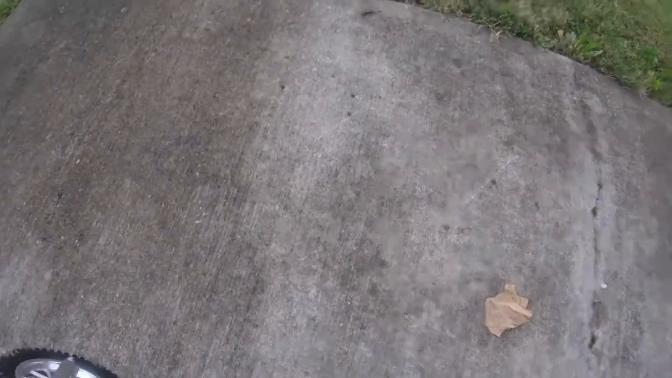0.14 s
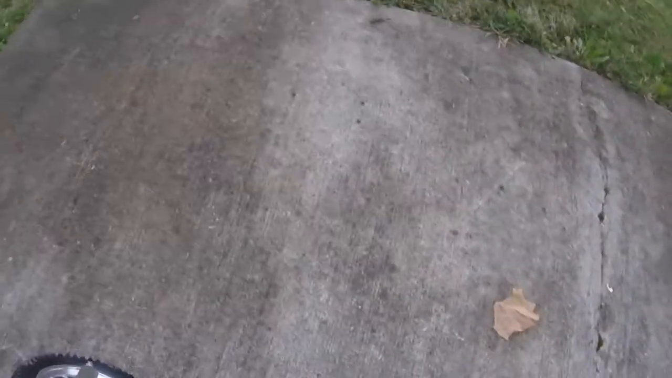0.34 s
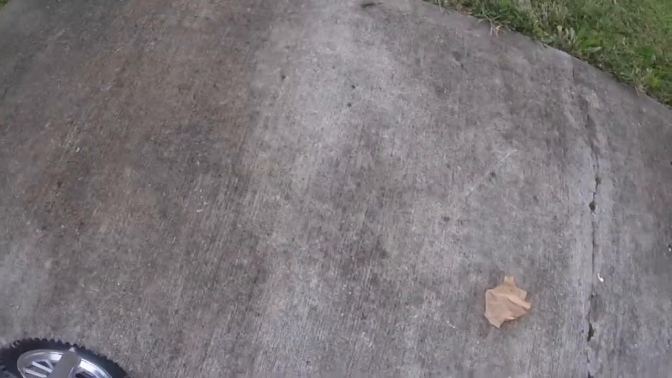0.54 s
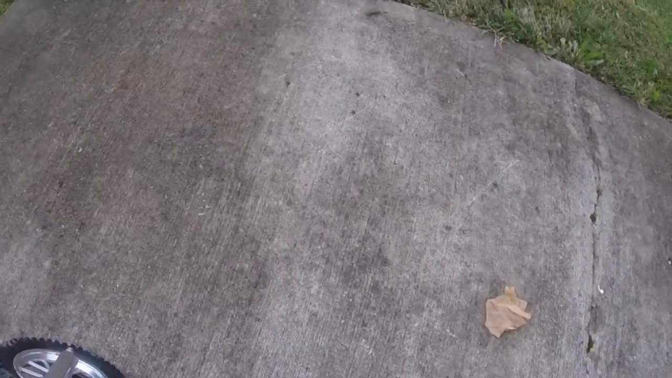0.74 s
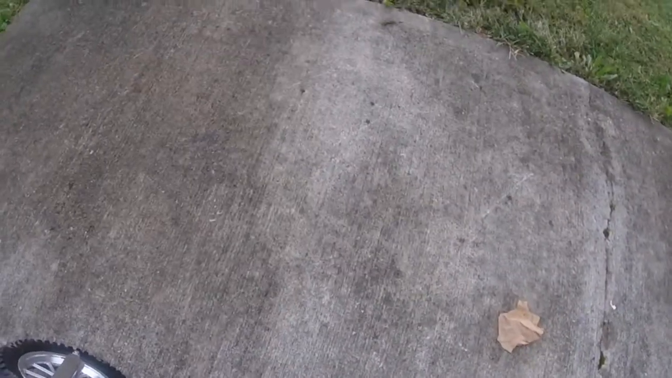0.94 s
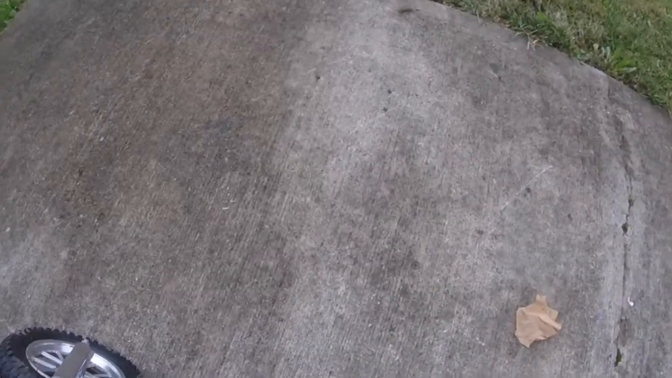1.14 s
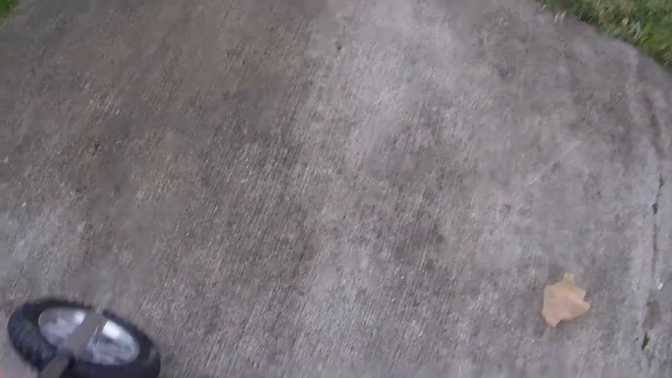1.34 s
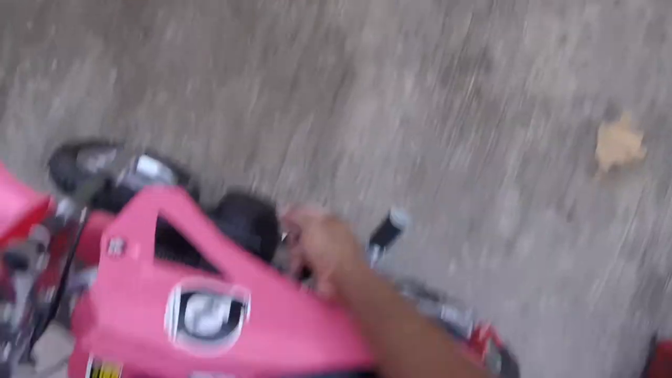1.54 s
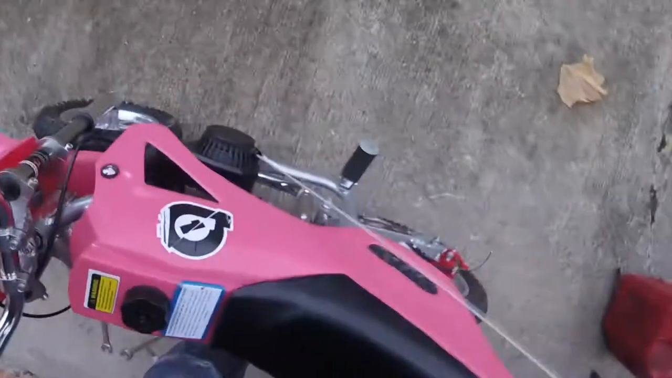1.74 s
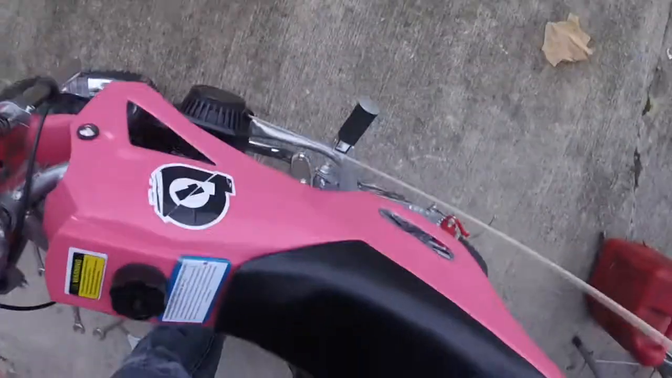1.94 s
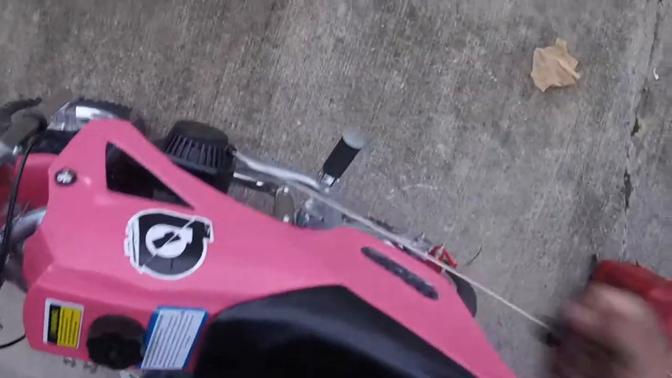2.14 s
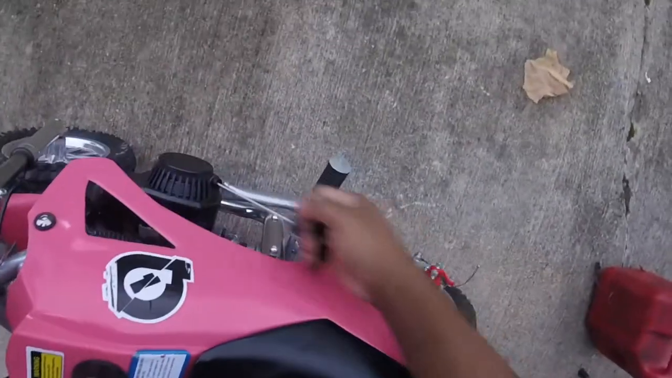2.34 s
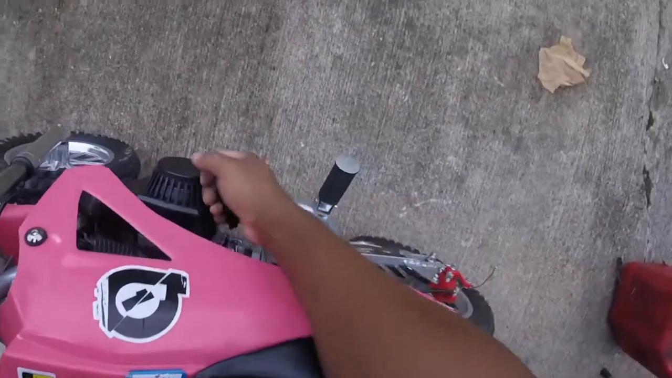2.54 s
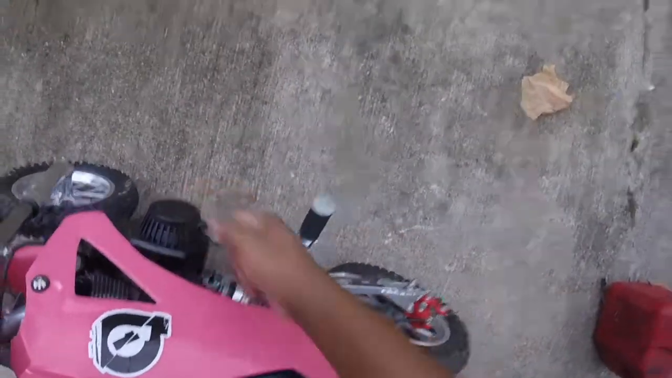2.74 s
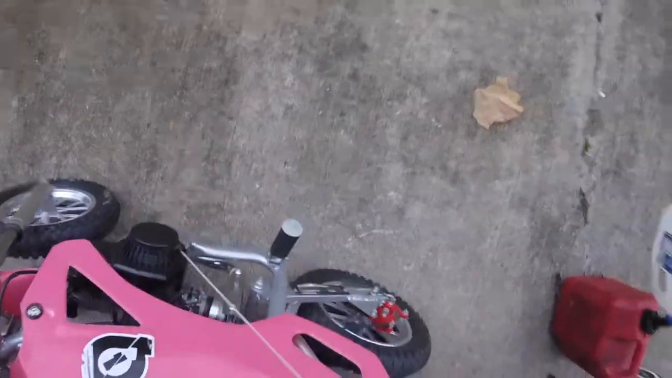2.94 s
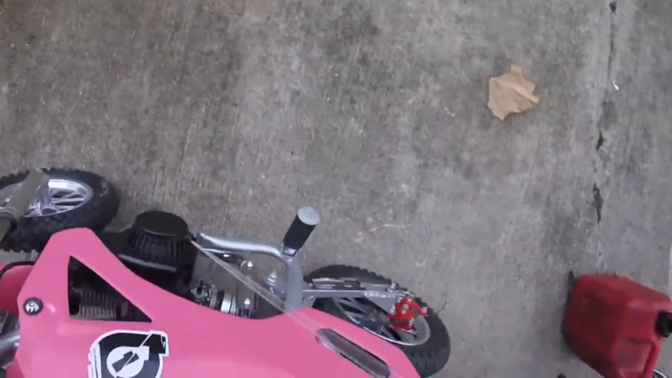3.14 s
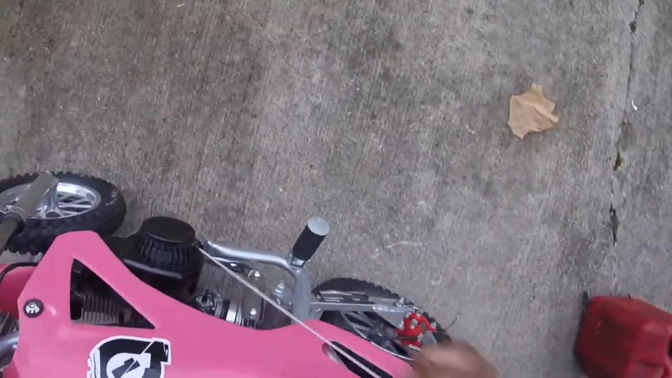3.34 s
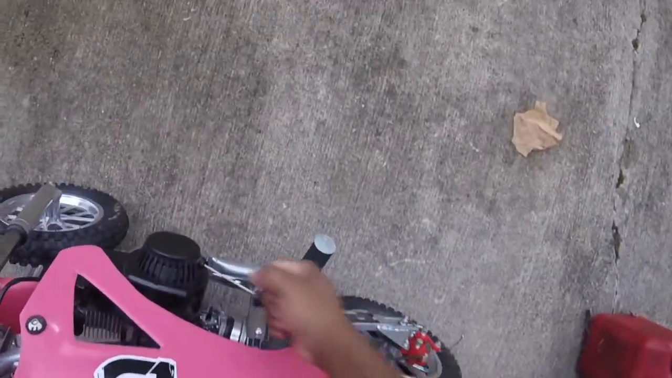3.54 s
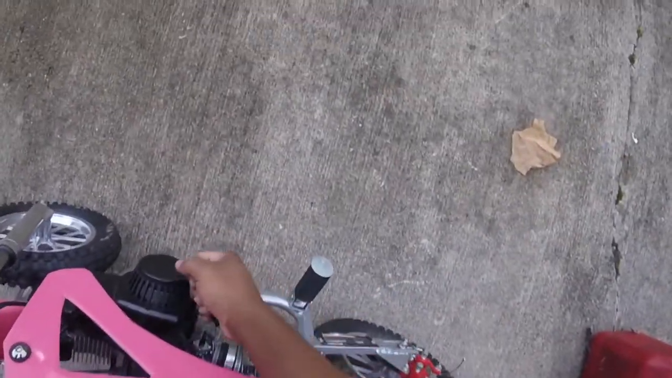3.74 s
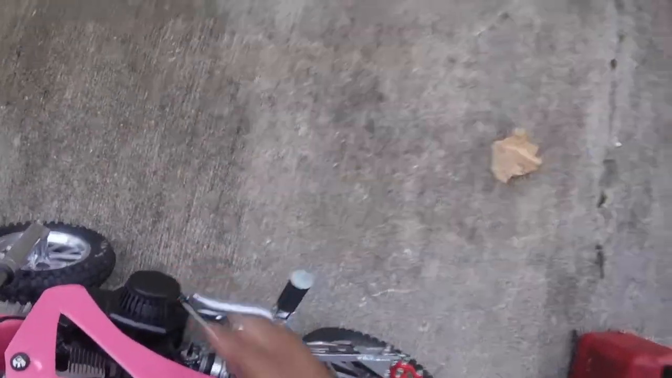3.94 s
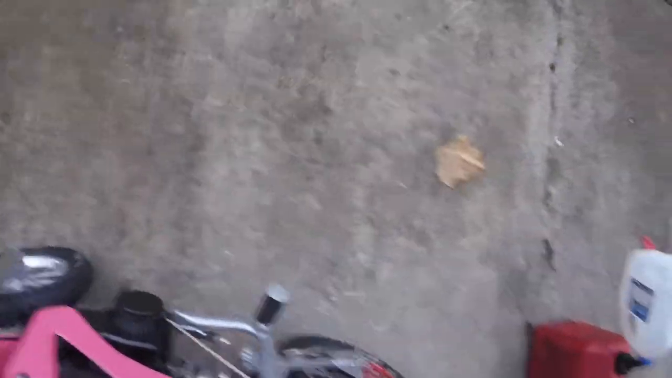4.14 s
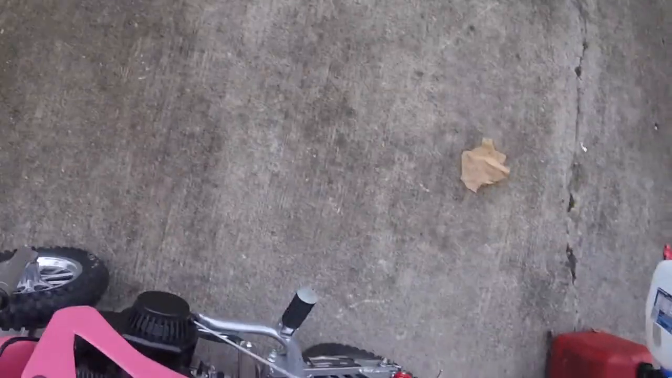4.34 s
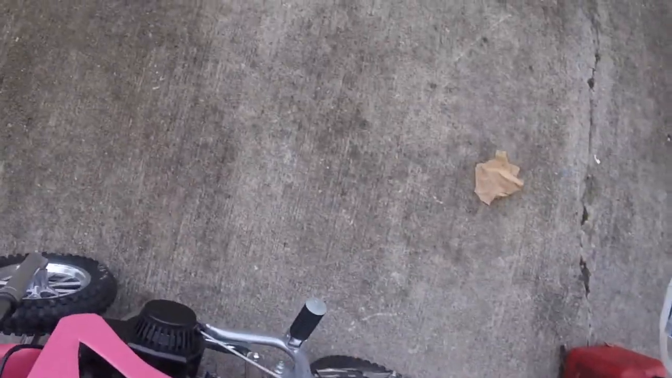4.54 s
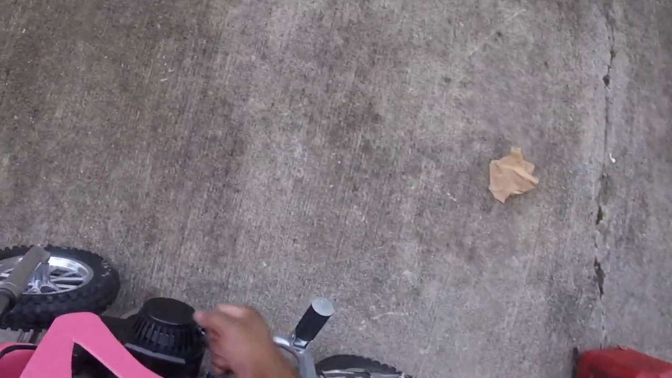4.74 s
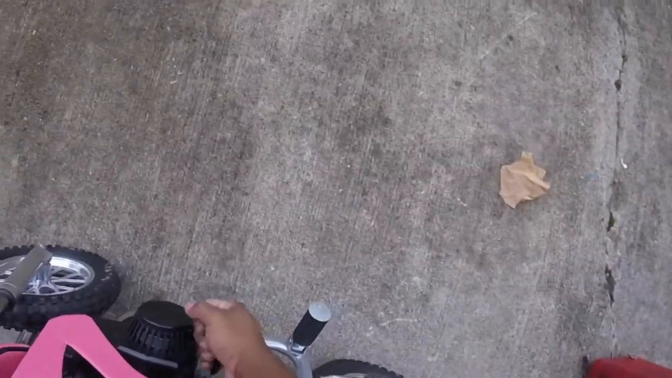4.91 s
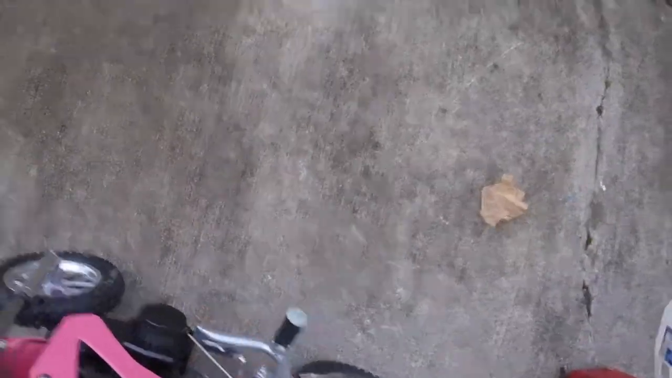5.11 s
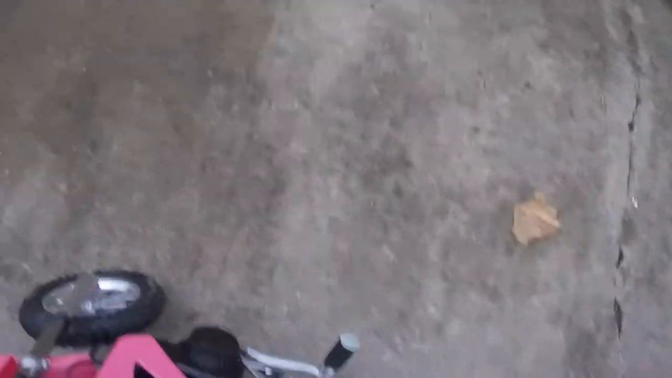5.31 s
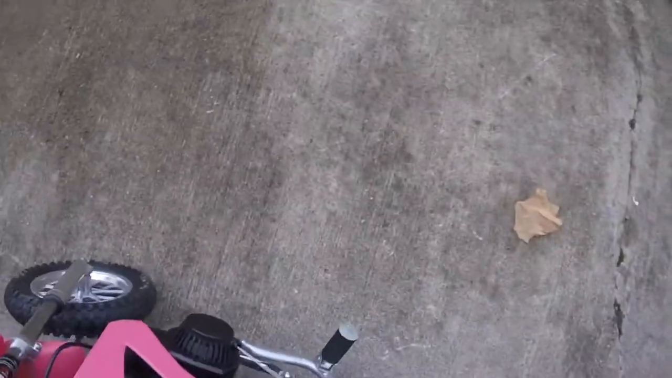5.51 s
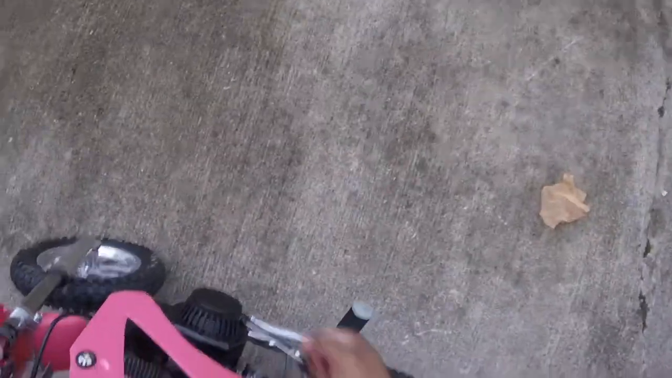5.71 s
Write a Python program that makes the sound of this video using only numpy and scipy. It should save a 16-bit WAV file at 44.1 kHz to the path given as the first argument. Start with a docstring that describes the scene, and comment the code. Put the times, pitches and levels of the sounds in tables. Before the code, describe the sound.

Outdoors, a mini bike's cold two-stroke engine is pulled over five times, a little over a second apart. Each time the starter knocks into gear, the rope rasps out and the engine gives a quick run of low chuffs without firing. The cord then winds back with bright metallic ratchet clinks that slow down. The microphone is very close, with only a faint hush of air behind.

```python
"""Pull-starting a cold two-stroke

A mini bike on a concrete drive is pulled over five times and never fires. The starter knocks into
mesh, the rope rasps by stick-slip friction, and the piston pumps six chuffs through resonant pipes.
A spring rewinds the rope while steel pawls clink ever more slowly; the close microphone overloads."""
import sys
import numpy as np
from scipy import signal
from scipy.io import wavfile
from scipy.ndimage import uniform_filter1d

SR = 44100
rng = np.random.default_rng(int(sys.argv[2]) if len(sys.argv) > 2 else 0)


def digitize_waveform(pressure):
    """Quantize a signal to 16-bit integers and store it at the path in sys.argv[1].

    Rows of a 2-D input are taken as channels; values are limited to [-1, 1].
    """
    field = np.atleast_2d(pressure).T
    bounded = np.clip(field, -1, 1)
    quanta = np.round(bounded * 32767).astype(np.int16)
    wavfile.write(sys.argv[1], SR, quanta)


N = 258773
TIME = np.arange(N) / SR


def amp(db):
    """Amplitude grows tenfold for every 20 dB."""
    return 10 ** (np.asarray(db) / 20)


def unit_rms(x):
    """Power normalisation: a sustained sound is scaled to an rms of one."""
    return x / np.sqrt(np.mean(x ** 2) + 1e-20)


def unit_hit(x):
    """Energy normalisation: a hit carries as much as 10 ms at an rms of one."""
    return x / np.sqrt(np.sum(x ** 2) / (SR / 100) + 1e-20)


def add(mix, start, sound):
    """Superposition: a sound joins the mix at a start time in seconds."""
    part = mix[max(round(start * SR), 0):][:len(sound)]
    part += sound[:len(part)]


def colour(spectrum, size=2048):
    """Minimum phase: the Hilbert transform turns a spectrum into a causal impulse response."""
    hz, db = np.transpose(spectrum)
    log_hz = np.log(abs(np.fft.fftfreq(size, 1 / SR)) + 1)
    beyond = np.maximum(np.log(hz[0]) - log_hz, 0) + np.maximum(log_hz - np.log(hz[-1]), 0)
    log_gain = np.log(amp(np.interp(log_hz, np.log(hz), db))) - 2 * np.minimum(beyond, 2)
    return np.fft.ifft(np.exp(np.conj(signal.hilbert(log_gain)))).real


def through(x, response):
    """Convolution: a linear system answers each sample with its impulse response."""
    return signal.fftconvolve(x, response)[:len(x)]


def ring(modes, t, wave=np.sin):
    """Free vibration is a sum of damped modes, each falling 60 dB in its T60."""
    return sum(amp(db - 60 * t / t60) * wave(2 * np.pi * hz * t) for hz, db, t60 in modes)


def wander(per_s):
    """Random modulation: straight lines join chance values, at an rms of one."""
    knots = np.arange(0, N / SR + 1, 1 / per_s)
    return unit_rms(np.interp(TIME, knots, rng.uniform(-1, 1, N)[:len(knots)]))


def bump(t, at, width):
    """A Gaussian pulse, whose width is its standard deviation."""
    return np.exp(-.5 * ((t - at) / width) ** 2)


def chatter(t, rise, hold, fall, rattle_db, rattle_fall, grain_db):
    """Contact bounce: a loose part lands in tiny impacts, then rattles out. Times are in seconds."""
    noise, size = rng.standard_normal((2, len(t)))
    grains = amp(grain_db * np.repeat(size, 16)[:len(t)])
    volley = np.exp(-np.maximum(t - hold, 0) / fall) + amp(rattle_db) * np.exp(-t / rattle_fall)
    return noise * grains * volley * (1 - np.exp(-t / rise))


# Spectrum of the outdoor air. Each row: frequency in Hz, relative level in dB.
AIR_SPECTRUM = [(20, -6.5), (36, 4.5), (55, 4.5), (80, -6), (170, -15.5), (400, -18), (700, -20.5),
                (1200, -23), (2200, -29), (4300, -37.5), (5600, -39), (6300, -23), (8000, -39),
                (11000, -41), (14000, -66)]

def air(level_db=-44.5, swell_db=0.1):
    """Ambient noise: a quiet broadband hush with a light rumble."""
    hush = unit_rms(through(rng.standard_normal(N), colour(AIR_SPECTRUM, size=8192)))
    return amp(level_db + swell_db * wander(15)) * hush


# Knocks of handle, starter and frame. Each row: start in seconds, level in dB, thud level in dB.
KNOCKS = [(0.1268, -33, -25), (0.15, -28, -24.5), (0.2028, -24, -21), (0.2269, -9.5, -21),
          (0.2614, -12, -15.5), (0.2725, -14, -19.5), (1.1837, -29, -42), (1.5261, -33, -34),
          (1.6225, -20.5, -12.5), (1.6894, -11.5, -22), (1.7427, -12, -17), (1.8719, -16, -3),
          (2.01, -41, -20.5), (2.563, -29, -26), (2.8386, -10.5, -17.5), (2.865, -10, -21.5),
          (2.8905, -12, -16.5), (2.9894, -17, -9), (3.901, -30, -35.5), (4.0254, -11, -21.5),
          (4.0761, -12, -22), (4.2063, -27, -16), (5.0155, -26, -41), (5.049, -26, -30), (5.1176, -9, -27),
          (5.1665, -14, -23), (5.2889, -18, -15)]
# Spectra of a knock's middle, bass and treble. Each row: frequency in Hz, relative level in dB.
KNOCK_SPECTRUM = [(150, -37), (500, 3), (900, 3), (1400, -1.5), (1870, 5), (2350, 1), (3300, 0.5),
                  (5000, -1.5), (8000, -35.5)]
THUD_SPECTRUM = [(60, -6), (200, 5.5), (480, 0.5), (800, -7.5), (1300, -3)]
SNAP_SPECTRUM = [(3500, -17), (5200, -2.5), (6400, 3.5), (7400, -12.5), (9200, -16), (11200, -30),
                 (13000, -55)]
# Modes of the starter as it grips. Each row: frequency in Hz, relative level in dB, T60 in seconds.
GRIP_MODES = [(794, -2.5, 0.097), (1903, 5, 0.063), (2147, -11, 0.013), (3256, -22.5, 0.014)]

def knocks(knock_db=-5, thud_db=-4, snap_db=-10, grip_db=-13.5):
    """Damped impact: under load the starter's plastic and metal knock but barely ring."""
    out, t = np.zeros(N), TIME[:SR // 8]
    knock, thud, snap = colour(KNOCK_SPECTRUM), colour(THUD_SPECTRUM), colour(SNAP_SPECTRUM)
    grip = ring(GRIP_MODES, t)
    for start, db, low_db in KNOCKS:
        hits = chatter(t, rise=.00017, hold=.0032, fall=.007,
                       rattle_db=-6.5, rattle_fall=.019, grain_db=0)
        for response, level_db in ((knock, db + knock_db), (grip, db + grip_db),
                                   (thud, low_db + thud_db), (snap, db + snap_db)):
            add(out, start, amp(level_db) * unit_hit(through(hits, response)))
    return out


# The five pulls. Each row: first chuff in seconds, lead of the slack take-up in seconds, time stretch
# as a factor, rope level in dB, chuff level in dB, pawl ring centre in Hz, pawl tip bite in dB.
PULLS = [(0.325, 0.072, 0.995, 0.5, -2, 6440, -5.5), (1.7995, 0.23, 1.01, 0, 1.5, 6100, -9.5),
         (2.948, 0.257, 0.975, 1, -0.5, 6400, -19), (4.1333, 0.233, 1.066, -0.5, -0.5, 6570, -17),
         (5.2222, 0.247, 0.98, 0.5, 0, 6580, -32)]
# The rope running out. Each row: time from the first chuff in seconds before stretch, level in dB.
ROPE_RUN = [(-0.1, -20.5), (-0.075, -26.5), (-0.05, -21), (-0.02, -24.5), (0.07, -14), (0.15, -26),
            (0.22, -32.5), (0.26, -30.5)]

def rope_envelope(slack_db=-37.5, taut_db=-36.5, jerk_db=4, jerks_per_s=90):
    """Friction noise follows the pull: the slack comes in by jerks, then the rope runs out hard."""
    gain, jerks = np.zeros(N), jerk_db * wander(jerks_per_s)
    for first, slack_lead, stretch, rope_db, *_ in PULLS:
        start, taut, stop = first - slack_lead, first - stretch * .17, first + stretch * .26
        run = [(first + stretch * after, db + rope_db) for after, db in ROPE_RUN]
        times, levels = np.transpose([(start, slack_db), (taut, taut_db)] + run)
        level_db = np.interp(TIME, times, levels) + jerks * (TIME < taut)
        gain += amp(level_db) * (TIME >= start) * (TIME <= stop)
    return uniform_filter1d(gain, SR // 200)


# Spectra of rope rasp, frame drone and low shudder. Each row: frequency in Hz, relative level in dB.
RASP_SPECTRUM = [(300, -9.5), (560, 1), (750, 5), (1200, 0), (1450, 4), (2400, -5.5), (3100, 1), (3600, -3),
                 (4500, -1), (5300, -5), (6500, -1.5), (8000, -12.5), (9000, -14.5), (11500, -38)]
DRONE_SPECTRUM = [(60, -0.5), (180, -26.5), (280, 7.5), (400, -23), (700, -37)]
SHUDDER_SPECTRUM = [(25, 0.5), (58, 0.5), (110, -8.5), (220, -7)]

def rope(rasp_db=-2, slip_db=2.5, slips_per_s=300, grain_db=4, drone_db=-15, rocking_db=-12):
    """Stick-slip friction: the braided rope rasps in its eyelet, and the frame drones and rocks."""
    slips = rng.standard_normal(N) * amp(slip_db * wander(slips_per_s) + grain_db * wander(3000))
    rasp = amp(rasp_db) * unit_rms(through(slips, colour(RASP_SPECTRUM)))
    drone = amp(drone_db) * unit_rms(through(slips, colour(DRONE_SPECTRUM)))
    shudder = unit_rms(through(rng.standard_normal(N), colour(SHUDDER_SPECTRUM, size=8192)))
    return rope_envelope() * (rasp + drone + amp(rocking_db) * shudder)


# Crank turns in a pull. Each row: time from the first chuff in seconds before stretch, level in dB.
TURNS = [(0, -1.5), (0.034, -0.5), (0.0612, 0), (0.0898, -1), (0.1265, -7.5), (0.185, -9)]

def crank_turns():
    """The two-stroke cycle gives one chuff a turn, listed as time in seconds and level in dB."""
    return [(first + stretch * after, chuff_db + db)
            for first, _, stretch, _, chuff_db, *_ in PULLS for after, db in TURNS]


# Air modes of cylinder, exhaust and intake. Each row: frequency in Hz, level in dB, T60 in seconds.
PIPE_MODES = [(54.2, -16.5, 0.25), (112, -24, 0.095), (185.3, -12.5, 0.066), (211, -22.5, 0.091),
              (261.8, -20.5, 0.24), (337, -7.5, 0.092), (367.8, -12, 0.093)]

def chuffs(push_db=-10, suck_db=-9, intake_db=-15, crankcase_db=-20, gush_db=-24, muffler_hz=460):
    """Pipe resonance: the port opens, the cylinder sucks and pushes, and the air columns ring."""
    out, t = np.zeros(N), TIME[:SR // 4]
    lead = .005  # seconds of room for the suction ahead of the push
    opening = bump(t[:SR // 50], lead, .0003)
    pipe = through(ring(PIPE_MODES, t, np.cos), opening / opening.sum())
    puff = amp(push_db) * bump(t, lead, .0007) - amp(suck_db) * bump(t, lead - .0024, .0007)
    # the crankcase spits back about half a turn later, then draws air in
    crankcase = amp(crankcase_db) * (bump(t, lead + .015, .004) - bump(t, lead + .026, .004))
    for at, db in crank_turns():
        gush = unit_hit(through(rng.standard_normal(len(t)) * np.exp(-t / .028), pipe))
        add(out, at - lead, amp(db) * (puff + crankcase + pipe + amp(gush_db) * gush))
        intake_lag = .01023 * rng.uniform(1, 1.04)
        add(out, at - lead + intake_lag, amp(db + intake_db) * pipe)
    return signal.sosfiltfilt(signal.butter(6, muffler_hz, fs=SR, output="sos"), out)


# Pawls flung loose as the flywheel overruns the starter or the handle comes to rest.
# Each row: start in seconds, steel ring in dB, housing clack in dB.
LOOSE_CLINKS = [(0.0174, -8.5, -23), (0.1252, -20, -35), (0.3885, -15, -26), (0.407, -10, -40),
                (0.4375, -8, -30), (0.4439, -1, -45), (0.4524, -4, -34), (0.4624, -8, -16.5),
                (0.4744, -7.5, -37), (1.1652, -11.5, -22.5), (1.9074, -19, -17.5), (1.929, -27, -16),
                (1.937, -8.5, -33), (1.95, -15, -13.5), (1.9614, -16, -22), (2.7458, -11, -21),
                (3.038, -8, -18.5), (3.0589, -2.5, -28), (3.0856, -8, -21), (3.1103, -8, -33),
                (3.1184, -7.5, -23), (3.1373, -3, -27), (3.1502, -5, -25), (4.2482, -8.5, -37),
                (4.2621, -5.5, -25), (4.2747, -6, -19), (5.3303, -2.5, -35), (5.3444, -10, -36),
                (5.3537, -3, -18), (5.3644, -8, -36)]
# The spring winding the rope back, one list for each rewind.
# Each row: time in seconds, speed in teeth per second, steel ring in dB, housing clack in dB.
REWINDS = [
    [(0.5654, 52.54, -8.2, -27), (0.6744, 22.75, -10.5, -25), (0.7125, 23.85, -12.5, -23.5),
     (0.9494, 18.39, -11.5, -24.5), (1.04, 7.64, -13, -26)],
    [(2.0743, 33.11, -32, -19), (2.2299, 29.46, -12.5, -20), (2.3608, 27.15, -15.5, -19.5),
     (2.4279, 12.53, -11.7, -20.5), (2.52, 22.3, -16.5, -24.5)],
    [(3.1789, 28.59, -18, -33), (3.2053, 20.75, -18.5, -23.5), (3.343, 23.87, -18, -27),
     (3.5651, 18.43, -15, -24.5), (3.76, 9.61, -9.5, -21)],
    [(4.3829, 72.89, -5.5, -23.5), (4.4119, 39.75, -9.5, -25), (4.577, 34.13, -11, -22.5),
     (4.8149, 9.0, -11.5, -20.5), (4.85, 7.0, 0, -17)],
    [(5.4685, 57.26, -5.5, -23), (5.6012, 33.25, -8.5, -20.5), (5.6285, 36.99, -9.5, -21.5),
     (5.7446, 20.01, -9, -21.5), (5.85, 19.13, -9.5, -20.5)],
]

def tooth_rate(rewind):
    """Tooth-passing frequency in Hz, zero outside this rewind."""
    times, speed, *_ = np.transpose(rewind)
    return np.interp(TIME, times, speed, left=0, right=0)


def pawl_drops(ring_scatter_db=1.43, clack_scatter_db=2.1, centre_scatter_hz=180):
    """Ratchet action: besides the loose clinks, a pawl drops each time a whole tooth has passed."""
    drops = list(LOOSE_CLINKS)
    for rewind in REWINDS:
        times, _, ring_db, clack_db = np.transpose(rewind)
        teeth = np.ceil(np.cumsum(tooth_rate(rewind)) / SR)
        for at in TIME[1:][np.diff(teeth) > 0]:
            drops.append((at, rng.normal(np.interp(at, times, ring_db), ring_scatter_db),
                          rng.normal(np.interp(at, times, clack_db), clack_scatter_db)))
    # each drop takes its ring centre and bite from the pull it belongs to
    first, slack_lead, *_, centre_hz, bite_db = np.transpose(PULLS)
    pulls = np.searchsorted((first - slack_lead)[1:], [at for at, _, _ in drops])
    return [(*drop, rng.normal(centre_hz[pull], centre_scatter_hz), bite_db[pull])
            for drop, pull in zip(drops, pulls)]


# Modes of a pawl with its steel cup, and of the housing with the flywheel.
# Each row: frequency in Hz, relative level in dB, T60 in seconds.
STEEL_MODES = [(6116, 7, 0.06), (6180, -11, 0.06), (6410, 9.5, 0.021), (6403, 8.5, 0.039),
               (6590, 4.5, 0.038), (7070, -17, 0.13), (7670, -23.5, 0.041), (8800, -16, 0.049),
               (10500, -23, 0.048), (10440, -23.5, 0.15), (12400, -32.5, 0.051)]
HOUSING_MODES = [(543, -20, 0.33), (661, -5.5, 0.055), (800, -18.5, 0.014), (985, -12.5, 0.04),
                 (1267, -21.5, 0.029), (1436, -2, 0.069), (1775, -9, 0.043), (2091, -15.5, 0.12),
                 (2300, -6, 0.054), (3023, -1, 0.03), (3884, 6, 0.031), (4304, 2.5, 0.013)]
# Spectrum of the housing's clack. Each row: frequency in Hz, relative level in dB.
CLACK_SPECTRUM = [(150, -38), (400, -13), (700, 15), (1500, -8.5), (2300, 8.5), (3200, 2), (4200, 10.5),
                  (5100, -13.5), (6400, 22.5), (8300, -18.5), (11000, -29.5), (12200, -6), (16000, -64)]

def pawls(drops, steel_db=-3, housing_db=-4, favour_db=7, reach_hz=230, vary_db=4, detune=0.015):
    """Impact excitation: each falling pawl rings like a small bell and shakes the housing."""
    out, t, clack = np.zeros(N), TIME[:SR // 6], colour(CLACK_SPECTRUM)
    partials = np.array([ring([mode], t) for mode in STEEL_MODES])
    mode_hz = np.transpose(STEEL_MODES)[0]
    for start, ring_db, clack_db, centre_hz, _ in drops:
        bounces = chatter(t, rise=.001, hold=.0065, fall=.0035,
                          rattle_db=-16, rattle_fall=.012, grain_db=3.5)
        shakes = chatter(t, rise=.00051, hold=.0067, fall=.0036,
                         rattle_db=-27, rattle_fall=.013, grain_db=4)
        # the contact point favours modes near the ring centre and varies the housing's response
        steel = amp(favour_db * bump(mode_hz, centre_hz, reach_hz)) @ partials
        housing = ring([(hz * rng.normal(1, detune), rng.normal(db, vary_db), t60)
                        for hz, db, t60 in HOUSING_MODES], t)
        add(out, start, amp(ring_db + steel_db) * unit_hit(through(bounces, steel)))
        add(out, start, amp(clack_db) * unit_hit(through(shakes, clack)))
        add(out, start, amp(clack_db + housing_db) * unit_hit(through(shakes, housing)))
    return out


# Spectrum of a pawl tip's scrape. Each row: frequency in Hz, relative level in dB.
TIP_SPECTRUM = [(4000, -23.5), (7000, -8.5), (9300, 1), (11200, -3), (12500, -14.5)]
# Modes of the tip. Each row: frequency in Hz, relative level in dB, T60 in seconds.
TIP_MODES = [(7340, -6, 0.05), (9250, 5, 0.05), (11500, -28, 0.05), (10750, -3.5, 0.067)]

def pawl_tips(drops, ring_db=-14):
    """Sliding contact: each pawl's tip scrapes over its tooth with a bright tick and rings briefly."""
    out, t = np.zeros(N), TIME[:SR // 10]
    tick, ringing = colour(TIP_SPECTRUM), ring(TIP_MODES, t)
    for start, _, clack_db, _, bite_db in drops:
        scrape = chatter(t, rise=.0004, hold=.0028, fall=.0074,
                         rattle_db=-15, rattle_fall=.015, grain_db=5.5)
        add(out, start, amp(clack_db + bite_db) * unit_hit(through(scrape, tick)))
        add(out, start, amp(clack_db + ring_db) * unit_hit(through(scrape, ringing)))
    return out


# Spectrum of the flywheel fan. Each row: frequency in Hz, relative level in dB.
FAN_SPECTRUM = [(4000, -22), (6500, 9.5), (8200, -6), (11000, -16), (12500, -44)]

def fan(level_db=-27, lag_s=0.047, spread_s=0.013, flutter_db=3):
    """Amplitude-modulated noise: the flywheel fan zips once after each turn of the crank."""
    spin = sum(amp(db) * bump(TIME, at + lag_s, spread_s) for at, db in crank_turns())
    swish = rng.standard_normal(N) * amp(flutter_db * wander(550))
    return amp(level_db) * spin * unit_rms(through(swish, colour(FAN_SPECTRUM)))


# Spectrum of the scraping reel. Each row: frequency in Hz, relative level in dB.
REEL_SPECTRUM = [(100, -3), (400, -3.5), (700, 4), (1100, -10.5), (1440, 5), (1800, -1.5), (3800, -4),
                 (5200, -9), (6400, 8.5), (8000, -11.5), (11000, -42), (13000, -30)]

def reel(level_db=-7, reference_teeth_per_s=34.1, db_per_doubling=7, roughness_db=2.5):
    """Sliding friction: the reel and its spring scrape the housing, louder the faster they turn."""
    gain = np.zeros(N)
    for rewind in REWINDS:
        times, _, _, clack_db = np.transpose(rewind)
        doublings = np.log2(tooth_rate(rewind) / reference_teeth_per_s + 1e-9)
        gain += amp(np.interp(TIME, times, clack_db) + level_db + db_per_doubling * doublings)
    scrape = rng.standard_normal(N) * amp(roughness_db * wander(360))
    return uniform_filter1d(gain, SR // 100) * unit_rms(through(scrape, colour(REEL_SPECTRUM)))


def low_rub(at_s=1.52, spread_s=0.032, level_db=-43.5):
    """Low-frequency noise under a Gaussian envelope: one soft rub before the second pull."""
    shudder = unit_rms(through(rng.standard_normal(N), colour(SHUDDER_SPECTRUM, size=8192)))
    return amp(level_db) * bump(TIME, at_s, spread_s) * shudder


# Late clinks that leave the steel cup singing. Each row: start in seconds, level in dB.
CUP_STRIKES = [(3.748, -30.5), (4.832, -25)]
# Modes of the freed cup and flywheel. Each row: frequency in Hz, relative level in dB, T60 in seconds.
CUP_MODES = [(2035, -21, .4), (3424, -31, .6), (3850, -26, .4), (4705, -27, .4), (6140, 0, .33),
             (7040, -9, .16), (11230, -16, .2)]

def singing_cup():
    """Free decay: at the end of two of the rewinds the freed cup rings on."""
    out = np.zeros(N)
    for start, db in CUP_STRIKES:
        add(out, start, amp(db) * ring(CUP_MODES, TIME[:SR // 3]))
    return out


def yard(direct, wet_db=-20, t60=0.14, echoes_per_s=2000, cutoff_hz=3500):
    """Scattering: the concrete and nearby walls return faint, dull echoes from 6 ms on."""
    t = TIME[:SR // 3]
    echoes = rng.standard_normal(len(t)) * (rng.random(len(t)) < echoes_per_s / SR)
    echoes *= (t > .006) * amp(-60 * t / t60)
    echoes = signal.lfilter(*signal.butter(1, cutoff_hz, fs=SR), echoes)
    return direct + amp(wet_db) * through(direct, echoes / np.linalg.norm(echoes))


def scene():
    """Superposition: starter, cold engine, their echoes and the background sum in one channel."""
    drops = pawl_drops()
    starter = pawls(drops) + pawl_tips(drops) + knocks() + rope() + reel() + singing_cup()
    engine = chuffs() + fan()
    return (yard(starter + engine) + air() + low_rub())[None]


def record(dry, roll_off_hz=11600, leak_db=-26, band_limit_hz=15800):
    """Hard clipping: the microphone loses most of the top octave and flattens the loudest clinks."""
    passed = signal.sosfilt(signal.cheby1(8, .5, roll_off_hz, fs=SR, output="sos"), dry)
    leak = signal.sosfilt(signal.butter(3, [roll_off_hz, 13500], "band", fs=SR, output="sos"), dry)
    clipped = np.clip(passed + amp(leak_db) * leak, -1, 1)
    band_limit = signal.firwin(511, band_limit_hz, window=("kaiser", 9), fs=SR)
    return signal.oaconvolve(clipped, band_limit[None], "same")


dry = scene()
out = record(dry)
digitize_waveform(out)
```